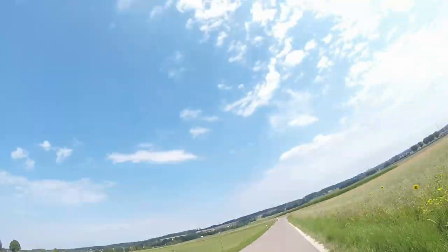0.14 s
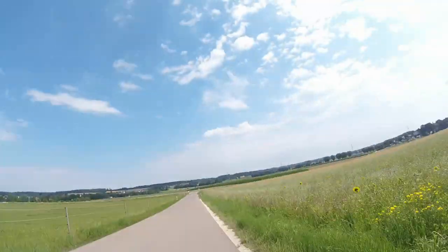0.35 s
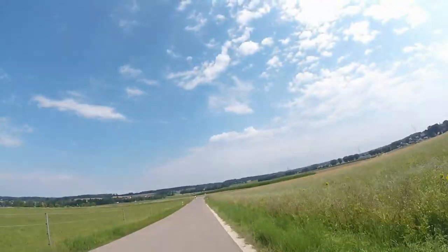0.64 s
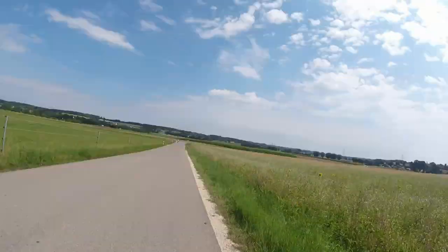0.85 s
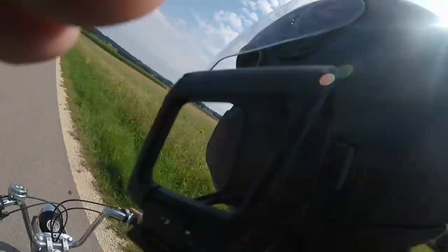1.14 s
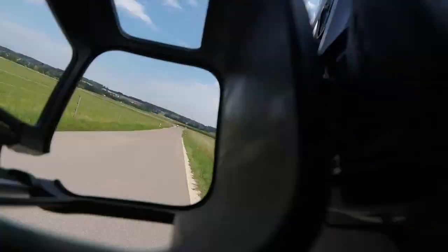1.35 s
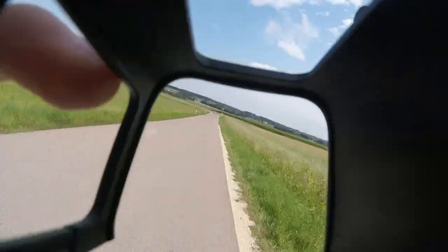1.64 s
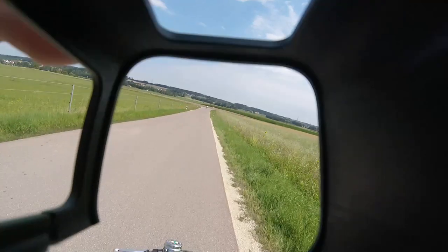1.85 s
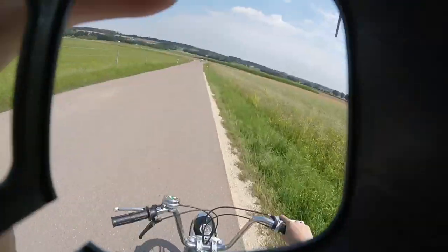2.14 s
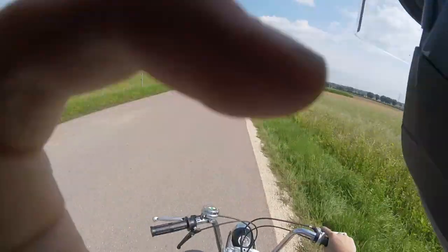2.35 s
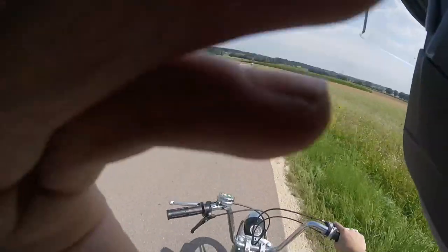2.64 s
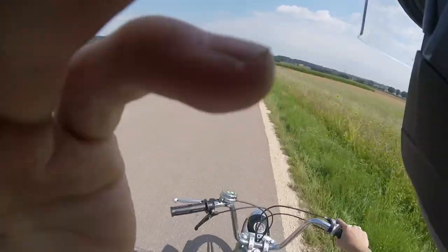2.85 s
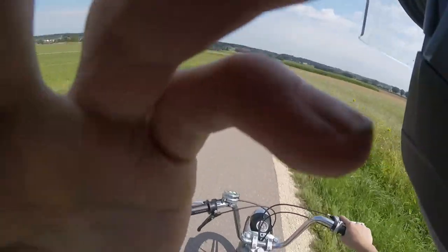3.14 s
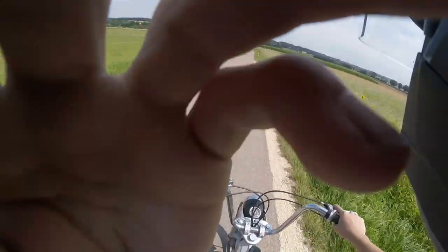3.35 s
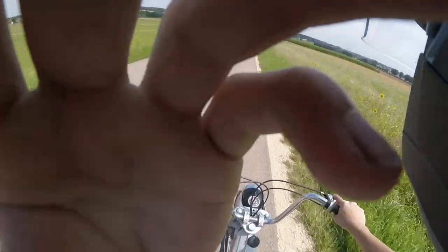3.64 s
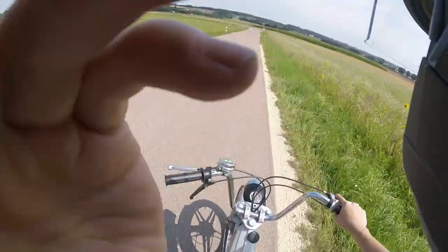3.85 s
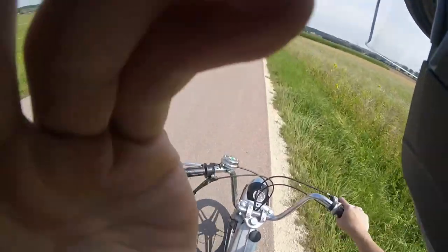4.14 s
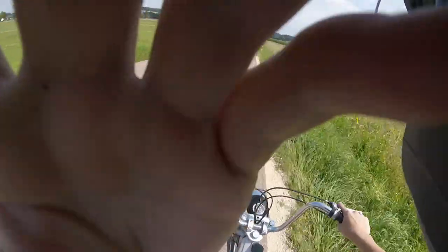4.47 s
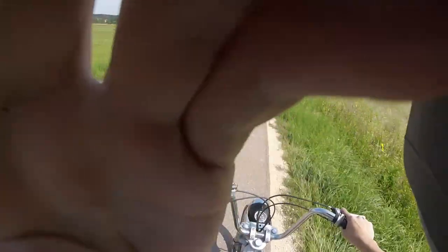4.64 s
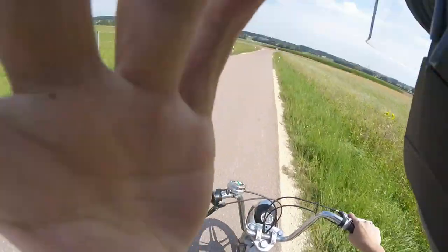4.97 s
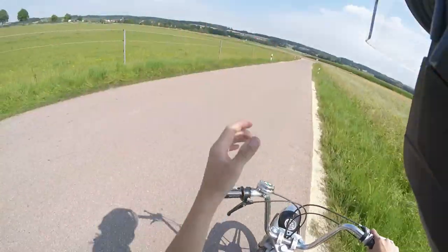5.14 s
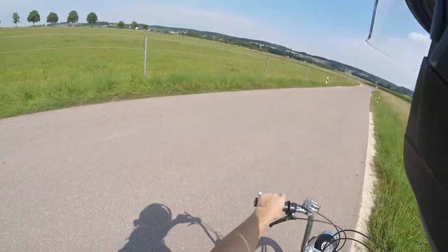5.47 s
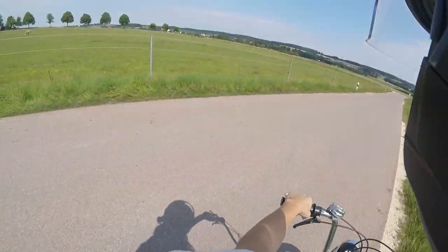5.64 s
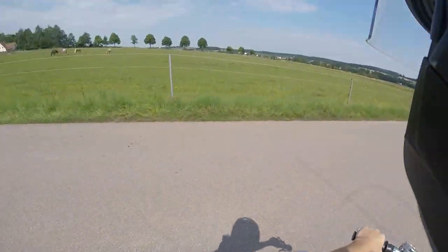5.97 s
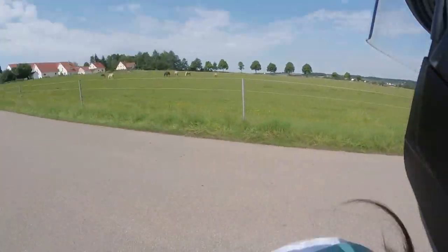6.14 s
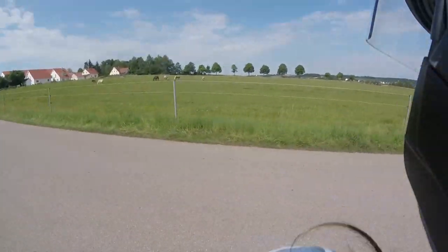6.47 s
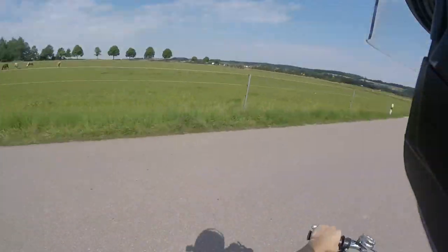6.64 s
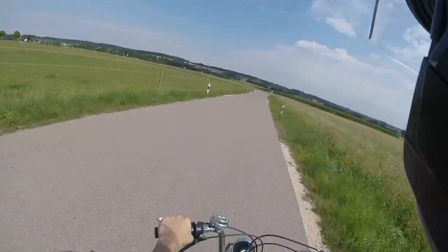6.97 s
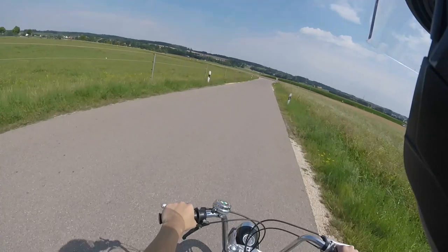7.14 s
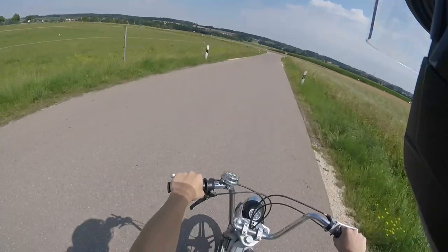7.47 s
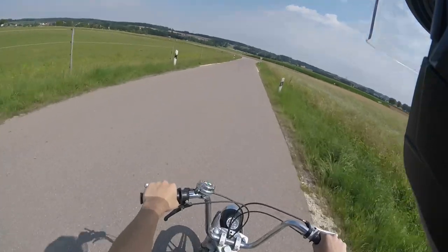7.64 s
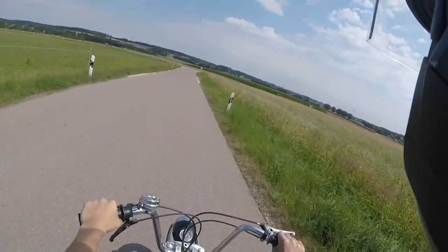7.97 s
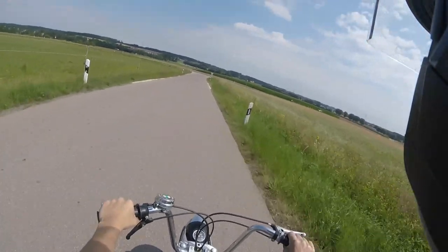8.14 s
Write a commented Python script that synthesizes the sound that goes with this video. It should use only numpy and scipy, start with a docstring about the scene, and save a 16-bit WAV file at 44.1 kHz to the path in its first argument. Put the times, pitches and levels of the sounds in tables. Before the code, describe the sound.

Close rider's view of a sputtering, clattering moped slowing down, with loud bumps and rubbing on the camera, blustery wind, then a buzzing acceleration.

```python
"""A two-stroke moped putters and clatters along a country road, slows, then opens its throttle and pulls away.
Each firing is an impulse that excites the resonances of pipe and silencer; piston slaps excite fins and covers.
Wind, as filtered noise, buffets a helmet camera; a hand rubs and knocks its housing with noise strokes and
damped oscillations, and plastic ticks. The hardest peaks make a limiter duck everything for a moment."""
import sys
import numpy as np
from scipy import signal
from scipy.fft import rfft, irfft, next_fast_len
from scipy.io import wavfile
from scipy.ndimage import uniform_filter1d, minimum_filter1d, map_coordinates

SR = 44100
rng = np.random.default_rng(int(sys.argv[2]) if len(sys.argv) > 2 else 0)


def generate_wav(signal):
    """Clip the signal to [-1, 1] and save it as 16-bit WAV at the path in sys.argv[1]."""
    frames = np.transpose(np.atleast_2d(signal))
    scaled = np.clip(frames, -1, 1) * 32767
    pcm = np.round(scaled).astype(np.int16)
    wavfile.write(sys.argv[1], SR, pcm)


N = 366471

# spectrum of rough friction, also of spluttering air: [f/Hz, relative level/dB]
SCRAPE_SPECTRUM = [(40, -42), (150, 1.5), (400, 1), (1000, -7.5), (1700, -15), (4000, -28), (8000, -39.5),
                   (15000, -54)]


def amp(db):
    """Level to amplitude: 20 dB is a factor of ten."""
    return 10 ** (np.asarray(db) / 20)


def unit(x):
    """Normalisation to an rms amplitude of 1."""
    return x / np.sqrt(np.mean(x ** 2) + 1e-20)


def curves(rows):
    """Linear interpolation in time: one value per sample for each column after t/s."""
    s, *columns = np.transpose(rows)
    return [np.interp(np.arange(N) / SR, s, column) for column in columns]


def wobble(rate):
    """Band-limited random fluctuation: a spline through rate random knots a second."""
    knots = rng.standard_normal(4096)
    return map_coordinates(knots, [np.arange(N) * rate / SR], mode="wrap")


def filtered(x, response):
    """Linear filtering: the spectrum is multiplied by a complex response of frequency."""
    m = 2 * next_fast_len(N // 2 + 8192)
    return irfft(rfft(x, m) * response(np.fft.rfftfreq(m, 1 / SR)), m)[:N]


def coloured(x, points):
    """Minimum-phase filtering with the gain of [f/Hz, gain/dB] points, so no ring precedes its cause."""
    def response(hz):
        f, db = np.transpose(points)
        log_gain = np.log(amp(np.interp(np.log(hz + 1), np.log(f), db)))
        # folding the cepstrum onto positive times makes the filter causal
        cepstrum = irfft(log_gain)
        half = len(cepstrum) // 2
        cepstrum[1:half] *= 2
        cepstrum[half + 1:] = 0
        return np.exp(rfft(cepstrum))
    return filtered(x, response)


def rung(x, modes):
    """Modal superposition: parallel resonators [f/Hz, bandwidth/Hz, level/dB] of alternating sign."""
    def response(f):
        total = 0
        for k, (centre, width, db) in enumerate(modes):
            damping = 1j * f * width
            total = total + (-1) ** k * amp(db) * damping / (centre * centre - f * f + damping)
        return total
    return filtered(x, response)


def add(track, at, waves):
    """Superposition: one row of waves is added to the track at each sample position."""
    index = at.astype(int)[:, None] + np.arange(waves.shape[1])
    track += np.bincount(np.clip(index, 0, N).ravel(), waves.ravel(), N + 1)[:N]


def strengths(count, scatter_db):
    """Random amplitudes with a normal spread in level, one row each."""
    return amp(scatter_db * rng.standard_normal(1024)[:count, None])


def pulses(at, scatter_db, size=16):
    """Band-limited impulses: windowed sincs of uneven strength at positions between samples."""
    track = np.zeros(N)
    lag = np.arange(size) - size // 2 - (at % 1)[:, None]
    window = np.cos(np.pi * lag / (size + 2)) ** 2
    add(track, at - size // 2, strengths(len(at), scatter_db) * np.sinc(lag) * window)
    return track


def moments(turns, share, jitter):
    """Crank phase: sample positions of one share of each turn, jittered by a fraction of a turn."""
    whole = np.arange(int(turns[-1]))
    phase = whole + share + jitter * rng.standard_normal(1024)[:len(whole)]
    return np.interp(phase, turns, np.arange(N))


def burst(turns, share, fade):
    """Periodic relaxation: a gate opens once a turn and decays over fade turns."""
    return np.exp(-((turns - share) % 1) / fade)


def silencer(at, pitch_hz, ring_s, scatter_db, size=2200):
    """Resonator response: each firing swells and fades at one pitch; the running rms is then levelled."""
    track, now = np.zeros(N), at.astype(int)[:, None]
    t = np.maximum(np.arange(size) - (at % 1)[:, None], 0) / SR
    age = t / ring_s[now]
    swell = strengths(len(at), scatter_db) * age * np.exp(-age)
    add(track, at, -swell * np.sin(2 * np.pi * pitch_hz[now] * t))
    return track / np.sqrt(np.abs(uniform_filter1d(track ** 2, SR // 5)) + 1e-9)


def drifting(at, modes, stretch):
    """Time warping: firings ring fixed resonances on a warped clock, so all pitches move by stretch."""
    clock = np.cumsum(stretch / stretch.mean())
    firing = pulses(np.interp(at, np.arange(N), clock), scatter_db=1.3)
    ring = rung(firing, [(hz * stretch.mean(), width, db) for hz, width, db in modes])
    return unit(map_coordinates(ring, [clock], order=1))


def exhaust(turns, throttle, pop_db):
    """Impulse excitation: each firing pops and echoes, rings pipe and silencer and releases rushing gas."""
    # silencer resonance, shifting with gas heat and revs: [t/s, f/Hz]
    silencer_pitch = [(0, 342), (1, 384), (2.9, 381), (5.1, 362), (6.4, 462), (7.15, 485), (7.5, 371),
                      (7.9, 452), (8.3, 459)]
    # spectra of the pop, the bark under load and the rushing gas: [f/Hz, relative level/dB]
    pop_spectrum = [(25, -46), (55, 1), (110, -0.5), (210, -0.5), (300, -7), (450, -11.5), (700, -5),
                    (1100, -9.5), (1600, -20), (2400, -21), (4000, -34.5), (7000, -36), (13500, -48),
                    (14850, -37), (15800, -45)]
    bark_spectrum = [(200, -10.5), (600, -12), (740, 11.5), (850, -5.5), (980, 7.5), (1110, -12.5),
                     (1230, 15), (1450, 8.5), (1700, 2.5), (1830, -31), (1980, 7.5), (2500, -18),
                     (3300, -4.5), (7000, -42)]
    gas_spectrum = [(150, -27), (420, -19), (700, -18), (860, -10), (1100, -12), (1800, -9.5),
                    (2600, -12.5), (5000, -52), (15300, -48)]
    # resonances of the pipe, the tailpipe's hollow putter (at the silencer's mean pitch)
    # and a very faint, very high edge on each firing: [f/Hz, bandwidth/Hz, relative level/dB]
    pipe_modes = [(389, 37, 8.9), (529, 37, 16.9), (644, 25.5, 3.6), (778, 69, 6.4)]
    putter_modes = [(1033, 233, -4.5), (1254, 176, 1)]
    high_edge_modes = [(16500, 180, 0)]
    # throb of the silencer outlet: [multiple of the firing rate, relative level/dB]
    throb_partials = [(2, -14.5), (3, -19)]
    echo_s, echo_share = 0.001802, 0.32

    pitch_hz, = curves(silencer_pitch)
    ring_db = -37.5 + 36.5 * throttle
    ring_s = 0.0047 + 0.0026 * throttle

    at = moments(turns, 0, jitter=0.0012)
    firing = -pulses(at, scatter_db=0.7)
    # each pop returns once from the far end of the pipe
    echoed = filtered(firing, lambda hz: 1 + echo_share * np.exp(-2j * np.pi * hz * echo_s))
    pop = amp(5.5) * unit(coloured(echoed, pop_spectrum))

    # the putter is clearest with the throttle shut and follows the silencer's pitch only weakly
    stretch = (pitch_hz / pitch_hz.mean()) ** 0.051
    putter = -amp(1 - 17.5 * throttle) * drifting(at, putter_modes, stretch)
    pipe = amp(pop_db - 7 + 10 * throttle) * unit(rung(firing, pipe_modes))
    # under load the pressure front steepens into a bark
    bark = amp(-23) * throttle ** 1.37 * unit(coloured(firing, bark_spectrum))
    high_edge = amp(-57) * throttle ** 2 * unit(rung(firing, high_edge_modes))

    # the gas recedes as the engine fires cleanly under load
    puff = (burst(turns, 0, fade=.13) + .28) * rng.standard_normal(N)
    gas = amp(-10.5 - 9 * throttle) * unit(coloured(puff, gas_spectrum))

    # the harder the silencer is driven, the more its outlet throbs
    throb = sum(amp(db) * np.sin(2 * np.pi * round(k) * turns) for k, db in throb_partials)
    boom = amp(-9.0) * silencer(at, pitch_hz, ring_s, scatter_db=0.6) + throb
    return amp(pop_db - 6.5) * (pop + putter + gas) + bark + high_edge + pipe + amp(ring_db) * boom


def clatter(turns, throttle, level_db, size=900):
    """Modal excitation: piston slaps ring fins and covers and rattle the block; the chain sings in noise."""
    # piston and port knocks within a turn: [share of the turn, relative level/dB]
    slap_pattern = [(.01, -5), (.22, 0), (.33, -3), (.46, -3), (.73, -7)]
    # resonances of the cooling fins, the engine's covers and a steady metallic singing,
    # likely the drive chain: [f/Hz, bandwidth/Hz, relative level/dB]
    fin_modes = [(2887, 15, -3), (3197, 18, -4), (3372, 30, -3), (3492, 24, 0), (3618, 30, -2),
                 (3752, 40, 3), (3860, 40, -1), (4054, 30, 2.5), (4320, 50, -8)]
    cover_modes = [(4828, 24, -2), (4980, 24, -4), (5120, 240, -2), (5127, 24, -1), (5490, 50, -8),
                   (7870, 200, -15), (10900, 150, -17), (11950, 100, -16), (12330, 160, -15)]
    chain_modes = [(6455, 52, 0.5), (9610, 97, -12.5)]
    # levels of the two rings within the clatter: [t/s, fins level/dB, covers level/dB]
    ring_levels = [(0, -11.5, -14), (.55, -5.5, -15.5), (.95, -10.5, -15), (2.2, -11.5, -13),
                   (2.9, -6, -7.5), (3.7, -4.5, -12.5), (4.6, -3.5, -6.5), (5.6, -15.5, -15),
                   (7.5, -11.5, -16), (8.3, -19, -17)]
    # spectrum of the block's rattle: [f/Hz, relative level/dB]
    block_spectrum = [(500, -9.5), (1500, 6), (2500, 3), (3300, 4), (3900, 2.5), (4400, 0.5), (5200, -1.5),
                      (5900, -5), (6600, -2.5), (7400, -14), (8700, -16), (11500, -15.5), (12300, -16),
                      (13600, -12), (15500, -6.5)]
    # the clatter dulls at the very top: [f/Hz, gain/dB]
    top_gain = [(12800, -0.5), (13600, -7)]
    block_decay_s = 0.0035

    slaps, rattle = 0, 0
    for share, db in slap_pattern:
        slaps = slaps + amp(db) * pulses(moments(turns, share, jitter=.0007), scatter_db=1.5)
        rattle = rattle + amp(db) * burst(turns, share, fade=.11)
    gate = unit(rattle) + 1.4
    grit = unit(gate * rng.standard_normal(N))
    drive = unit(slaps) + .55 * grit

    fins_db, covers_db = curves(ring_levels)
    fins = amp(fins_db) * unit(rung(drive, fin_modes))
    covers = amp(covers_db) * unit(rung(drive, cover_modes))

    # one fixed noise decay makes the slaps repeat alike; their share of the power grows with throttle
    crankcase = np.exp(-np.arange(size) / SR / block_decay_s) * rng.standard_normal(size)
    regular = np.clip(0.2 + 0.4 * throttle, 0, 1)
    repeating = unit(signal.fftconvolve(slaps, crankcase)[:N])
    rough_block = np.sqrt(regular) * repeating + np.sqrt(1 - regular) * grit
    block = amp(-4.0) * unit(coloured(rough_block, block_spectrum))
    chain = amp(-19.5) * unit(rung(rng.standard_normal(N), chain_modes))
    return amp(level_db) * coloured(fins + covers + chain + block, top_gain)


def gusts():
    """Addition of powers: wind level in dB of a swaying airstream plus gusts that rise, hold and fall."""
    # gusts on the microphone: [t/s, time from onset to release/s, level/dB]
    gust_events = [(0.668, 0.49, -18.5), (1.242, 0.044, -14), (1.5, 0.11, -10), (1.675, 0.27, -14.5),
                   (2.372, 0.039, -15), (2.66, 0.045, -21), (3.379, 0.059, -10.5), (3.521, 0.1, -11.5),
                   (3.65, 0.16, -16.5), (4.415, 0.29, -18), (5.223, 0.22, -10.5), (5.436, 0.11, -6),
                   (5.578, 0.06, -6.5), (5.662, 0.079, -4.5), (5.779, 0.18, -3.5), (6.18, 0.28, -17),
                   (6.48, 0.22, -12), (6.72, 0.082, -5)]
    attack_s, release_s = 0.027, 0.065
    t = np.arange(N) / SR
    power = amp(-22 + 3 * wobble(8)) ** 2
    for s, length, db in gust_events:
        rise = np.clip((t - s) / attack_s, 0, 1)
        fall = np.clip(1 - (t - s - length) / release_s, 0, 1)
        power = power + (amp(db) * rise * fall) ** 2
    return 10 * np.log10(power)


def wind(turns):
    """Turbulence and saturation: eddies shaken by the engine drive a diaphragm that flattens the largest."""
    # spectra of the eddies and of the engine's shaking of the airflow: [f/Hz, relative level/dB]
    buffet_spectrum = [(15, -19), (30, 2), (60, 1.5), (120, -2.5), (220, -9), (400, -19.5), (900, -31.5),
                       (3000, -92), (9000, -75)]
    shake_spectrum = [(15, -26.5), (55, -2), (110, 1), (170, -7), (300, -18), (900, -54), (3000, -80)]
    level_db = gusts()
    lumpy = amp(1.36 * wobble(28)) * rng.standard_normal(N)
    eddies = unit(coloured(lumpy, buffet_spectrum))
    shaking = pulses(moments(turns, 0.276, jitter=0.039), scatter_db=4)
    shake = unit(coloured(shaking, shake_spectrum))
    # beside the eddies the shake grows by 0.58 dB per dB of wind
    eddies = unit(eddies + amp(0.58 * level_db) * shake)
    # noise gated by the eddies' own power splutters
    splutter = unit(coloured(np.tanh(eddies ** 2) * rng.standard_normal(N), SCRAPE_SPECTRUM))
    pressure = amp(level_db - 4.0) * eddies + amp(0.57 * level_db - 20.5) * splutter
    limit = .75
    return limit * np.tanh(pressure / limit)


def knocks(size=4400):
    """Damped oscillation: each bump is one heavily damped push with a short plastic crack of noise."""
    # bumps on the housing: [t/s, push peak level/dB, push f/Hz, crack level before colouring/dB]
    bumps = [(0.094, -8, 242, -18), (1.006, -9.5, 39.8, -40), (1.061, -14, 800, -13),
             (1.082, -11, 754, -11), (1.109, -12, 710, -8), (1.15, -12, 393, -11), (1.341, -28, 700, -15),
             (1.364, -28, 600, -9), (1.444, -14, 600, -18), (1.526, -9, 398, -14), (1.549, -5, 500, -1),
             (1.705, -6, 700, -4), (1.7316, 6, 380, 5), (1.7352, 2, 615, 5), (1.823, -11, 790, -16),
             (1.893, -7, 69, -33), (1.903, -3, 70, -28), (2.027, -8, 740, -20), (2.099, -6, 60.5, -8),
             (2.263, -13, 510, -17.5), (2.274, -2.5, 147.5, -23.5), (2.286, -1.5, 56.2, -27),
             (2.3812, -4, 450, -16), (2.409, -1.5, 500, -4), (2.4243, 7.5, 376, 8.5), (2.4268, 9, 129, 2),
             (2.511, -13, 297, -24), (2.753, -9, 100, -35), (3.812, -2.5, 66, -39), (4.193, -6.5, 59, 0),
             (4.55, -6, 55, -39), (4.7667, -12, 198, 20), (4.7699, 6.5, 97, 25), (5.01, -8.5, 206, -30)]
    # colouring of the cracks: [f/Hz, gain/dB]
    crack_spectrum = [(100, -6), (350, 0), (800, 0), (1500, -10), (2600, -6), (4000, -16), (6500, -14),
                      (9000, -27), (15000, -34)]
    s, push_db, push_hz, crack_db = np.transpose(bumps)[:, :, None]
    t, pushes, cracks = np.arange(size) / SR, np.zeros(N), np.zeros(N)
    at = s[:, 0] * SR
    push = np.sin(2 * np.pi * push_hz * t) * np.exp(-1.2 * push_hz * t)
    add(pushes, at, amp(push_db) * push / push.max(axis=1, keepdims=True))
    crack = np.exp(-t / 0.00083) * rng.choice([-1, 1], push.shape)
    add(cracks, at, amp(crack_db) * crack)
    return pushes + coloured(cracks, crack_spectrum)


def rubs():
    """Stick-slip friction: fingers drag over the housing as rough noise with random slips, and hiss."""
    # strokes over the housing: [t/s, length/s, drag level/dB, hiss level/dB]
    strokes = [(1.049, 0.026, -24.5, -49), (1.076, 0.08, -24, -55), (1.141, 0.027, -21, -48),
               (1.322, 0.13, -22.5, -59), (1.432, 0.19, -21.5, -63), (1.507, 0.057, -39, -59),
               (1.794, 0.11, -28, -50), (2.013, 0.033, -23.5, -43), (2.23, 0.044, -16.5, -30),
               (6.769, 0.12, -25, -53)]
    # spectrum of the hiss: [f/Hz, relative level/dB]
    hiss_spectrum = [(800, -3), (2000, -5), (4500, 8), (7000, 7), (10000, -5), (15000, -30)]
    slips_per_s, slip_db = 350, 6.5  # skin catching, and its level over the noise of the drag
    t, drag, hiss = np.arange(N) / SR, np.zeros(N), np.zeros(N)
    for s, length, drag_db, hiss_db in strokes:
        stroke = np.sqrt(np.abs(np.sin(np.pi * np.clip((t - s) / length, 0, 1))))
        drag += amp(drag_db) * stroke
        hiss += amp(hiss_db) * stroke
    catches = amp(4.4 * wobble(140)) * rng.standard_normal(N)
    slips = rng.choice([-1, 1], N) * (rng.random(N) < slips_per_s / SR)
    friction = unit(catches) + amp(slip_db) * unit(slips)
    scraping = drag * unit(coloured(friction, SCRAPE_SPECTRUM))
    return scraping + hiss * unit(coloured(catches, hiss_spectrum))


def ticks():
    """Free vibration: a loose plastic edge flicks the housing, and a few modes decay together."""
    # flicks: [t/s, level/dB]
    flick_events = [(1.402, -28), (1.482, -22), (1.687, -35)]
    # modes of the plastic: [f/Hz, relative level/dB]
    plastic_modes = [(4080, -3), (4550, -2), (9600, -14)]
    decay_s = 0.0016
    s, db = np.transpose(flick_events)
    t, flicks = np.arange(SR // 50) / SR, np.zeros(N)
    ring = sum(amp(mode_db) * np.sin(2 * np.pi * hz * t) for hz, mode_db in plastic_modes)
    add(flicks, s * SR, amp(db)[:, None] * np.exp(-t / decay_s) * ring)
    return flicks


def scene():
    """Superposition of engine, wind and handling at one microphone; firing rate integrates to phase."""
    # engine speed: [t/s, firing rate f/Hz]
    speed = [(0, 62.61), (.84, 60.98), (1.21, 60.11), (2.61, 57.06), (3.51, 54.35), (4.39, 52.08),
             (4.53, 51.28), (4.93, 50.66), (5.28, 51.57), (5.66, 54.19), (5.8, 56.16), (6.24, 59.27),
             (6.71, 65.38), (7.23, 70.08), (7.55, 74.09), (7.85, 79.6), (8.06, 87), (8.31, 94.4)]
    # throttle opening: [t/s, opening 0-1]
    throttle_opening = [(0, 0.38), (.6, 0.56), (.98, 0.56), (1.2, 0.26), (4.7, 0.37), (6.6, 0.08),
                        (7.3, 0.44), (7.6, 0.58), (7.8, 0.38), (7.92, 0.92), (8.3, 0.9)]
    # the engine as heard at the turning helmet: [t/s, exhaust level/dB, clatter level/dB],
    # to which each part adds its own relative level
    engine_levels = [(0, -33, -31), (.6, -30.5, -27), (.97, -32.5, -28), (1.2, -28.5, -36.5),
                     (1.6, -26.5, -30.5), (1.85, -35, -37.5), (2.2, -29, -28), (2.6, -26.5, -29.5),
                     (3.7, -25, -27.5), (4.6, -23.5, -26), (4.9, -25, -27), (5.3, -21.5, -26.5),
                     (5.85, -22.5, -34.5), (6.5, -26.5, -37.5), (7.1, -23.5, -27.5), (7.95, -17.5, -22),
                     (8.3, -18, -19.5)]
    turns = np.cumsum(curves(speed)[0]) / SR - .32  # one firing per crank turn
    throttle = np.clip(curves(throttle_opening)[0], 0, 1)
    pop_db, clatter_db = curves(engine_levels)
    engine = exhaust(turns, throttle, pop_db) + clatter(turns, throttle, clatter_db)
    handling = knocks() + rubs() + ticks()
    return (engine + wind(turns) + handling)[None]


def limiter(x, ceiling, release):
    """Gain control with look-ahead: the gain drops before a peak and its cut in dB decays exponentially."""
    ahead = SR // 20
    over_db = np.maximum(20 * np.log10(np.abs(x) / ceiling + 1e-9), 1e-6)
    held_db = -minimum_filter1d(-over_db, ahead, origin=-(ahead // 2))
    # a running maximum on a growing scale leaves each cut decaying with the release time
    recovery = np.exp(np.arange(N) / SR / release)
    cut_db = np.maximum.accumulate(held_db * recovery) / recovery
    return x * amp(-uniform_filter1d(cut_db, SR // 200))


def record(dry):
    """Limiting and band limitation: the camera ducks around peaks and passes nothing above its top."""
    top_hz = 15800
    limited = limiter(dry[0], ceiling=0.73, release=0.79)
    return filtered(limited, lambda hz: hz < top_hz)[None]


dry = scene()
out = record(dry)
generate_wav(out)
```